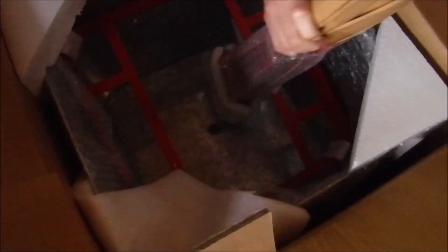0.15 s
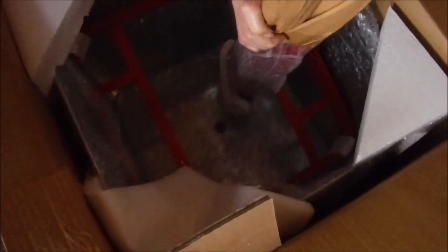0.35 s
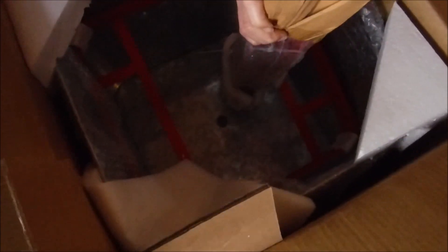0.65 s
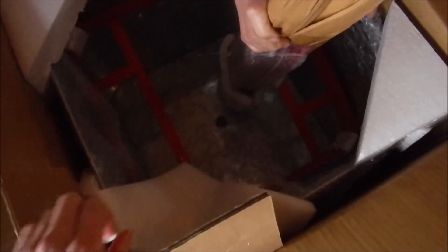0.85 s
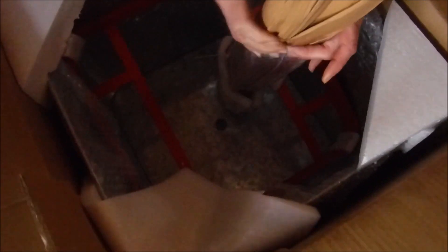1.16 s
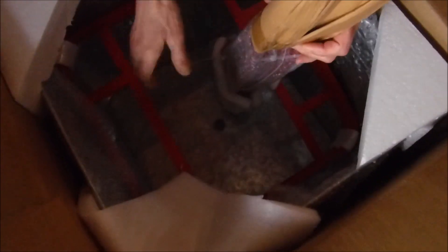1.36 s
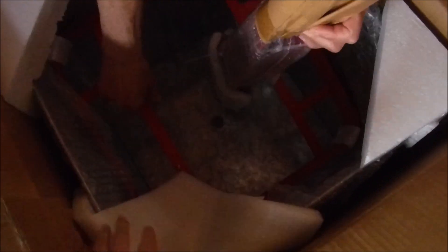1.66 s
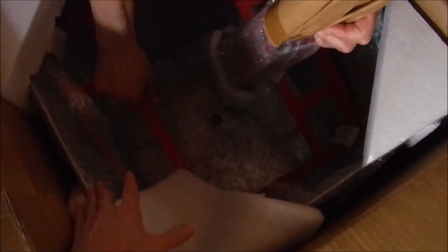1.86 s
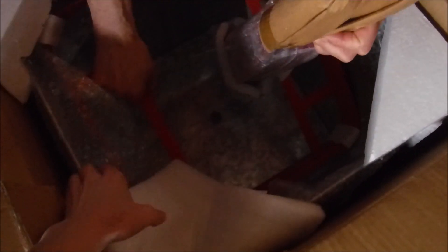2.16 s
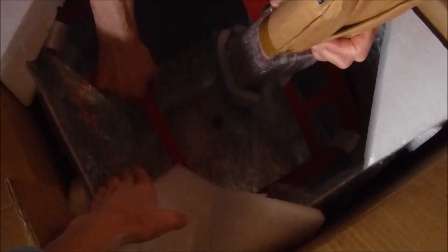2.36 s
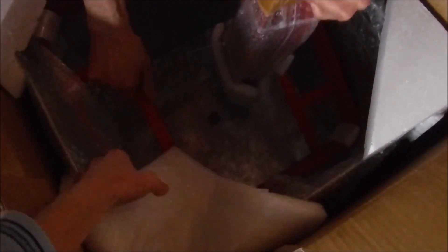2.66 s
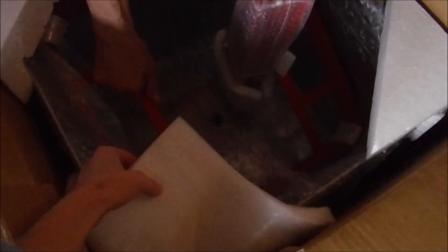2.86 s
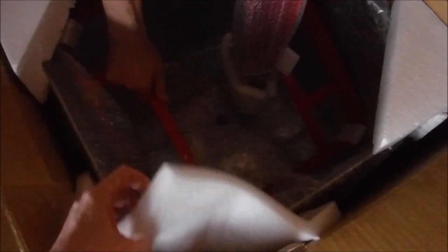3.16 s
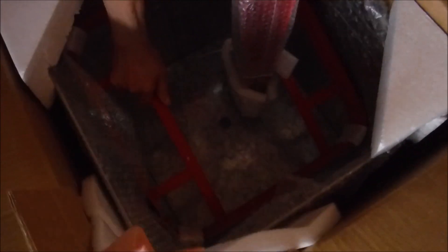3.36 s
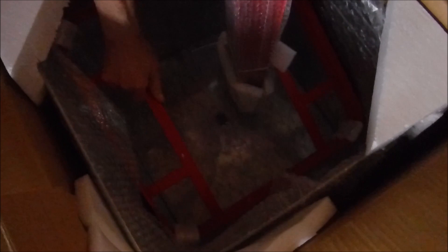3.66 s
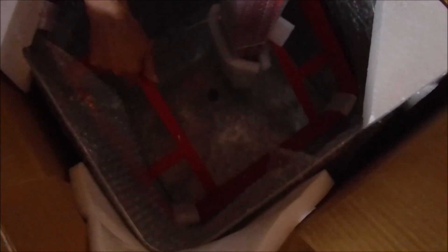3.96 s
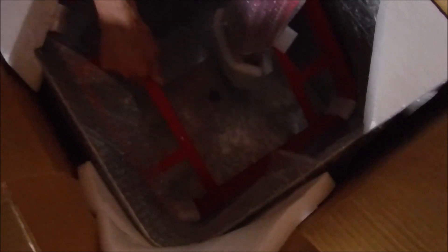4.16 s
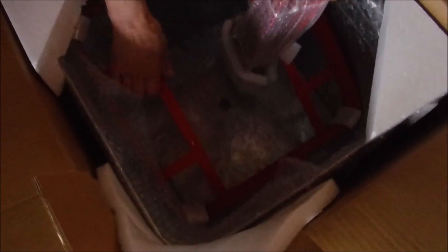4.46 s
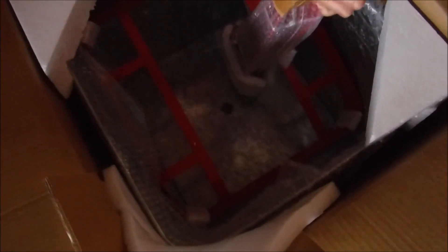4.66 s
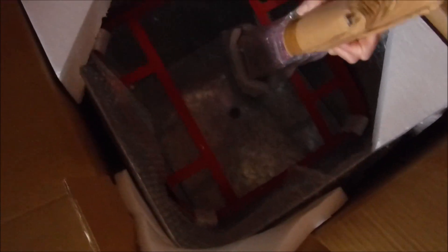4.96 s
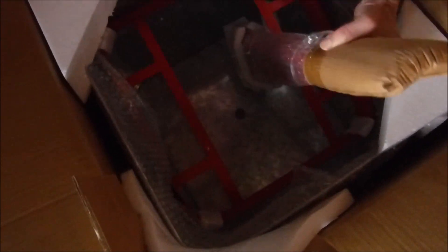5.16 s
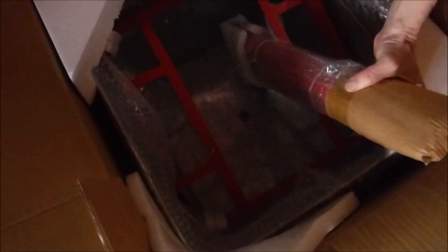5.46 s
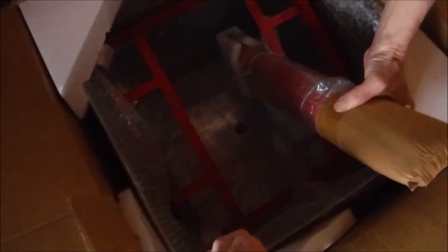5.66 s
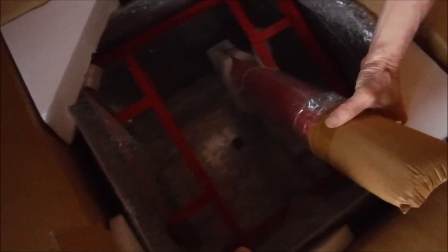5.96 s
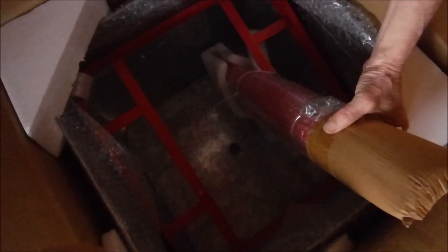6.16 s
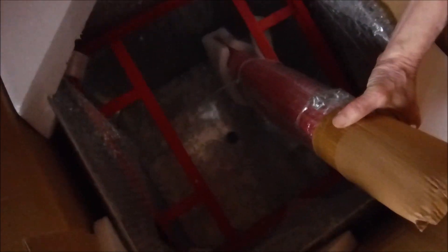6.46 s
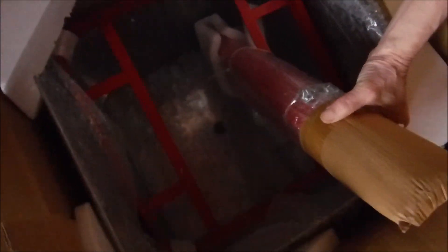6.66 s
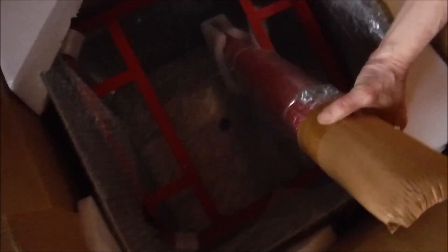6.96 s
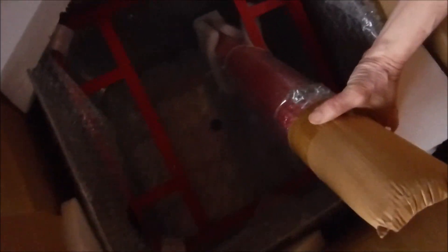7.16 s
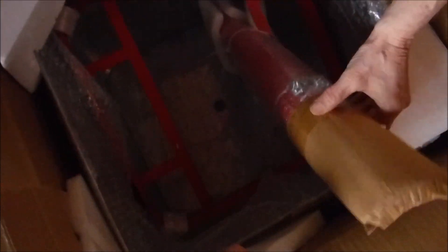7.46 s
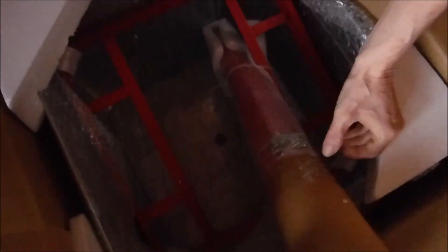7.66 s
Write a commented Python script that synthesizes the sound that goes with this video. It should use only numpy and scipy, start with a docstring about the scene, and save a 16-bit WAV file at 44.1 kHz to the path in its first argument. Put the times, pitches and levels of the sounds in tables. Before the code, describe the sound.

Crisp plastic film and stiffer packing paper rub, tick and snap irregularly, heard close in mono with faint room noise and hum. After a lively start the handling thins to isolated creases, dull cardboard bumps and a brief foam squeak. A quiet middle gives way to vigorous crunching and sharp knocks on the box, ending with looser, brighter crackling.

```python
"""Hands lift a part wrapped in plastic film and packing paper out of a cardboard box, in a small quiet room.
From the start, room noise and faint hum; strokes rub and crinkle film and paper as noise-driven buckles.
At once the part knocks the box (damped modes), creases snap (volleys of buckles), then soft bumps (noise pushes).
After 2 s foam squeaks briefly (unsteady tones). Wrapping is denser and louder from about 5.8 s to the end.
"""
import sys
import numpy as np
from scipy import signal
from scipy.fft import rfft, irfft
from scipy.io import wavfile
from scipy.ndimage import uniform_filter1d

SR = 44100
rng = np.random.default_rng(int(sys.argv[2]) if len(sys.argv) > 2 else 0)


def to_wav(s):
    """Save 16-bit WAV."""
    ch = np.atleast_2d(s).T  # columns
    pcm = np.round(np.clip(ch, -1, 1) * 32767)  # PCM
    wavfile.write(sys.argv[1], SR, pcm.astype(np.int16))


N = 344406
TIME = np.arange(N) / SR


def amp(db):
    """Decibels to gain."""
    return 10 ** (np.asarray(db) / 20)


def unit(x):
    """Scales to rms 1."""
    return x / np.sqrt(np.mean(x ** 2) + 1e-20)


def read(points, hz):
    """Reads a table on a log-frequency axis."""
    f, value = np.transpose(points)
    return np.interp(np.log(hz + 1), np.log(f), value)


def curve(rows, axis=1):
    """One dB column of a time table as a gain per sample."""
    rows = np.asarray(rows)
    return amp(np.interp(TIME, rows[:, 0], rows[:, axis]))


def add(mix, start_s, sound):
    """Mixes a sound in at start_s, cropped to the mix."""
    start = round(start_s * SR)
    sound = sound[max(-start, 0):]
    part = mix[max(start, 0):][:len(sound)]
    part += sound[:len(part)]


def response(spectrum, size=2048):
    """Causal (minimum-phase) impulse response with the given spectrum."""
    hz = abs(np.fft.fftfreq(size, 1 / SR))
    log_gain = np.log(amp(read(spectrum, hz)))
    minimum_phase = np.exp(np.conj(signal.hilbert(log_gain)))
    return np.fft.ifft(minimum_phase).real[:size // 2]


def colour(x, spectrum, size=2048):
    """Gives x a spectrum, at rms 1."""
    return unit(signal.oaconvolve(x, response(spectrum, size=size))[:len(x)])


def wander(per_s):
    """Random curve of rms 1: straight lines between per_s random points a second."""
    return unit(np.interp(TIME * per_s, np.arange(4096), rng.standard_normal(4096)))


# Room noise spectrum. Each row: frequency in Hz, relative level in dB per Hz.
ROOM_NOISE_SPECTRUM = [(15, 3), (30, 1.5), (70, 0), (150, -1.5), (240, -1), (400, -8), (800, -12),
                       (2000, -15), (6000, -19), (11000, -27.5), (16000, -28.5)]
# Hum tones. Each row: mean frequency in Hz, relative level in dB.
HUM_TONES = [(118.4, -64.5), (226.1, -60), (360.7, -68)]


def background(noise_db=-53.5, hum_db=-1, waver_db=2.5):
    """Steady coloured noise plus faint tones that waver in level and phase."""
    hum = np.zeros(N)
    for hz, db in HUM_TONES:
        gain = amp(db + waver_db * wander(8.3))
        hum += gain * np.sin(2 * np.pi * hz * TIME + 0.98 * wander(11))
    noise = colour(rng.standard_normal(N), ROOM_NOISE_SPECTRUM, size=8192)
    return amp(noise_db) * noise + amp(hum_db) * np.sqrt(2) * hum


# Hand strokes. Each row: start of hold in s, length of hold in s, thin film level in dB, stiff paper level in dB.
HAND_STROKES = [(0, 0.03, -18.5, -29), (0.046, 0.026, -29, -39), (0.121, 0.058, -24, -37.5),
                (0.201, 0.036, -29, -44.5), (.475, 0.005, -42, -56), (.745, 0.054, -39.5, -52),
                (1.08, 0.045, -31, -39.5), (1.152, 0.077, -39, -50.5), (1.328, 0.06, -40, -57.5),
                (1.542, 0.074, -38, -40), (1.651, 0.057, -36, -50), (1.729, 0.023, -35, -45),
                (1.938, 0.12, -38, -44.5), (2.026, 0.14, -34.5, -39.5), (2.439, 0.064, -44, -52),
                (2.867, .04, -41.5, -51), (2.93, .05, -39, -52), (3, 0.092, -44, -49.5),
                (3.451, 0.042, -42.5, -54), (3.576, 0.079, -48.5, -56), (3.91, .03, -43.5, -55),
                (3.966, 0.095, -40.5, -47.5), (4.374, .12, -48.5, -56.5), (4.835, 0.0069, -37.5, -49),
                (4.912, 0.022, -40, -44), (5.024, 0.038, -35, -68), (5.142, 0.061, -38, -47.5),
                (5.248, 0.037, -37, -46.5), (5.438, 0.068, -33, -43.5), (5.585, .03, -34, -47.5),
                (5.773, 0.0086, -37, -39.5), (5.814, 0.023, -25.5, -35.5), (5.877, 0.039, -19.5, -35.5),
                (5.981, 0.069, -29.5, -33), (6.125, 0.048, -36.5, -38), (6.214, 0.062, -23, -31),
                (6.336, 0.037, -16.5, -21.5), (6.398, 0.034, -16.5, -21.5), (6.476, 0.068, -33, -39),
                (6.581, 0.019, -25, -23.5), (6.612, 0.046, -28, -39.5), (6.75, 0.026, -26, -43),
                (6.8, 0.048, -24, -33), (6.981, 0.047, -28, -40), (7.107, 0.046, -24, -40),
                (7.248, .075, -32.5, -41), (7.486, 0.066, -23.5, -38), (7.586, 0.032, -24.5, -30),
                (7.648, 0.016, -29.5, -40), (7.689, 0.077, -37, -43.5)]
# Light rubbing between strokes. Each row: time in s, film level in dB.
LIGHT_CONTACT = [(0, -35.5), (.28, -39.5), (.44, -53), (.72, -43.5), (.93, -60.5), (1.08, -42),
                 (1.48, -47.5), (1.8, -40), (2.25, -47), (3.15, -42), (3.78, -56.5), (4.12, -48.5),
                 (4.8, -53.5), (4.86, -40), (6.72, -42), (6.92, -33), (7.25, -31), (7.8, -46.5)]


def rubbing(rise_s=0.014, release_s=0.014, contact_paper_db=-9.5):
    """Gains of film and paper: each stroke swells, holds and dies away, on top of light contact."""
    contact = curve(LIGHT_CONTACT)
    power = np.array([contact, contact * amp(contact_paper_db)]) ** 2  # paper relative to film
    for start_s, length_s, film_db, paper_db in HAND_STROKES:
        before = np.maximum(start_s - TIME, 0) / rise_s
        after = np.maximum(TIME - start_s - length_s, 0) / release_s
        power += amp([[film_db], [paper_db]]) ** 2 * np.exp(-2 * np.minimum(before + after, 20))
    return np.sqrt(power)


def facet(ring_s, ring_share, lo_hz, hi_hz, count=4, size=400):
    """One patch of sheet buckling: a click and a few quickly dying modes of its own."""
    t = np.arange(size) / SR
    hz = lo_hz * (hi_hz / lo_hz) ** rng.random((count, 1))
    ring = (np.cos(2 * np.pi * hz * t) * np.exp(-t / ring_s)).sum(0)
    click = t == 0
    pop = ring_share * ring / np.linalg.norm(ring) + click
    return pop / np.linalg.norm(pop)


def crinkle(per_s, spread_db, clump_db, ring_s, ring_share, count=24):
    """Clumps of tiny buckles, many small and few large, each on one of many facets."""
    sizes = amp(spread_db * np.minimum(rng.exponential(1, N), 4)) * rng.choice([-1, 1], N)
    clicks = sizes * (rng.random(N) < per_s / SR) * amp(clump_db * wander(130))
    which = rng.integers(0, count, N)
    out = np.zeros(N)
    for k in range(count):
        pop = facet(ring_s, ring_share, lo_hz=1203, hi_hz=9280)
        out += signal.oaconvolve(clicks * (which == k), pop)[:N]
    return unit(out)


def catches(per_s, length_s):
    """Ridges of the wrap catch and let go at an uneven pace; power of these short scrunches, mean 1."""
    ridges = np.floor(np.cumsum(per_s * amp(3 * wander(per_s))) / SR)
    strength = amp(7 * np.minimum(rng.standard_normal(N), 2))
    pulse = np.hanning(round(length_s * SR)) ** 2
    power = signal.oaconvolve(np.diff(ridges, prepend=0) * strength, pulse, "same")
    return abs(power) / abs(power).mean()


# Film spectrum, also used by the snaps. Each row: frequency in Hz, relative level in dB per Hz.
FILM_SPECTRUM = [(800, -50), (2000, -11.5), (2900, -7.5), (4200, -2.5), (5400, 3), (6400, 2.56),
                 (7400, -3.5), (8800, -8), (10500, -16.5), (13000, -26.5), (16000, -29)]
# Rubbed paper spectrum. Each row: frequency in Hz, relative level in dB per Hz.
PAPER_SPECTRUM = [(60, -30), (140, 3), (205, 4.5), (400, -5), (640, 1.5), (820, 3), (1000, -1),
                  (1350, -1.5), (1700, 1.5), (2100, 2), (2600, 3.5), (3400, -0.5), (5000, -16.5),
                  (9000, -39)]


def wrapping(slide_db=-2, tick_db=-9, effort_knee_db=-44.5):
    """Sliding hiss and crinkles excite film and paper together; harder handling buckles more facets."""
    film, paper = rubbing()
    effort = film / (film + amp(effort_knee_db))
    light = crinkle(per_s=1300, spread_db=3, clump_db=1.5, ring_s=0.0011, ring_share=1.2)
    hard = crinkle(per_s=5000, spread_db=2.7, clump_db=1.5, ring_s=0.0011, ring_share=1)
    hiss = amp(slide_db) * rng.standard_normal(N)
    drive = np.sqrt(1 - effort) * light + np.sqrt(effort) * hard + hiss
    # small creases tick at random, mostly while the wrapping moves gently
    ticks = crinkle(per_s=18, spread_db=2.2, clump_db=-2, ring_s=0.0019, ring_share=1.2, count=6)
    drive += amp(tick_db) * (1 - effort) * ticks
    # a gentle slide goes in separate scrunches, a hard one blurs them
    grip = 0.5 - 0.22 * effort
    scrunch = np.sqrt(1 - grip + grip * catches(per_s=110, length_s=0.009))
    # stiff paper also folds on its own, in fewer steps
    folds = crinkle(per_s=650, spread_db=1.16, clump_db=3, ring_s=0.0033, ring_share=0.48)
    return film * colour(drive * scrunch, FILM_SPECTRUM) + paper * colour(drive + folds, PAPER_SPECTRUM)


# Hard knocks of the part inside the box. Each row: start in s, relative level in dB.
PART_KNOCKS = [(.003, -20.5), (1.346, -33.5), (3.073, -36), (3.103, -35.5), (4.829, -29), (5.783, -29),
               (6.035, -25), (6.405, -14.5), (6.5755, -16), (6.5795, -9.5), (6.868, -34), (7.391, -32.5),
               (7.603, -26)]
# Box modes. Each row: nominal frequency in Hz, relative level in dB, 60 dB decay time in s.
KNOCK_MODES = [(131, -20, 0.13), (222, -1.5, 0.01), (358, -6.5, 0.024), (658, 2, 0.029), (780, 1, 0.0077),
               (1096, -4, 0.024), (1580, -6, 0.036)]


def knocks(level_db=-3, size=9000):
    """The part strikes the box and rings its damped modes, detuned a little at each blow."""
    out, t = np.zeros(N), np.arange(size) / SR
    for start_s, db in PART_KNOCKS:
        for k, (hz, mode_db, t60_s) in enumerate(KNOCK_MODES):
            # neighbouring modes of a wall swing in opposite senses
            swing = (-1) ** k * np.sin(2 * np.pi * hz * rng.uniform(0.887, 1.03) * t)
            add(out, start_s, amp(db + level_db + mode_db - 60 * t / t60_s) * swing)
    return out


def volley(run_s, spread_db=7.3, size=2048):
    """Buckles build up to the middle of the span, where the crease gives way and the rest die out."""
    t = (np.arange(size) - size // 2) / SR
    run_s = max(run_s, 1 / SR)
    swell = np.exp(-abs(t) / run_s) * np.where(t < 0, amp(-10), 1)
    buckles = swell * rng.standard_normal(size) * amp(spread_db * rng.standard_normal(size))
    z = rfft(buckles)
    # a snap is broadband: no one pitch stands out
    return irfft(z / np.sqrt(uniform_filter1d(abs(z) ** 2, size=110) + 1e-12))


# Creases that snap. Each row: time of giving way in s, film level in dB, paper level in dB, run time constant in s.
CREASE_SNAPS = [(0.009, -12.5, -29, .0017), (.0553, -20.5, -31, .0045), (0.1735, -21, -37, 0.0026),
                (.216, -21.5, -27.5, 0.0016), (.258, -21.5, -25, 0.0011), (0.413, -29.5, -39.5, 0.0037),
                (0.477, -26.5, -30.5, 0.0061), (.5103, -35.5, -54, 0.00055), (.6, -36, -48, .0015),
                (.651, -31.5, -26.5, 0.0015), (0.6582, -27.5, -55, 0.00091), (0.994, -27.5, -37, 0.0016),
                (1.001, -26.5, -40, .0014), (1.031, -30.5, -39, 0.0063), (1.072, -35, -36, .005),
                (1.117, -22.5, -43, 0.0015), (1.204, -22, -58, 0.00089), (1.245, -29, -32.5, .004),
                (1.273, -28, -62, 0.0012), (1.344, -31, -34.5, 0.0036), (1.45, -39, -57, .0007),
                (1.6055, -20.5, -40, 0.0032), (2.006, -24.5, -59, 0.0075), (2.046, -22, -54, 0.0058),
                (2.153, -30.5, -33, .004), (2.281, -40, -60, 0.0018), (2.471, -35, -38.5, 0.0023),
                (2.566, -37.5, -62, 0.0019), (2.872, -34, -54, 0.00076), (3.199, -31, -49, 0.0077),
                (3.3424, -35.5, -55, 0.00094), (3.7707, -34, -52, .001), (4.0997, -32, -41.5, 0.0015),
                (4.362, -38, -49, .004), (4.6364, -42, -44.5, 0.0016), (4.922, -24, -34, 0.0049),
                (5.032, -24.5, -47, .001), (5.039, -31.5, -47, 0.00062), (5.3844, -28.5, -35.5, 0.0014),
                (5.68, -29, -51, 0.0043), (5.77, -19.5, -26.5, 0.0048), (5.975, -16.5, -36, 0.0087),
                (5.997, -16.5, -32, 0.0022), (6.0036, -21, -23, 0.0011), (6.0344, -14.5, -17, 0.0019),
                (6.1936, -20, -31, 0.0015), (6.2634, -24, -37, .005), (6.314, -15.5, -20, 0.0041),
                (6.3281, -16.5, -15, 0.00023), (6.3317, -17, -12.5, 0.0022), (6.403, -15.5, -19, .002),
                (6.405, -11.5, -28, 0.0029), (6.5774, -43, -23, 0.002), (6.579, -18, -14, 0.0012),
                (6.9466, -35, -20.5, 0.00028), (7.148, -29, -27.5, .009), (7.2954, -19, -26, .006),
                (7.514, -18, -48, 0.0049), (7.528, -16.5, -29, 0.0025), (7.616, -25.5, -48, .001)]
# Snapping paper spectrum. Each row: frequency in Hz, relative level in dB per Hz.
CREASE_SPECTRUM = [(200, -20), (700, 2.5), (1400, 10), (2600, 12.5), (4200, 7.5), (6000, -6.5),
                   (12000, -56)]


def snaps():
    """Each crease drives film and paper; its level is its energy spread over 5 ms."""
    out, film, paper = np.zeros(N), response(FILM_SPECTRUM), response(CREASE_SPECTRUM)
    energy_norm = np.sqrt(0.005 * SR)
    for snap_s, film_db, paper_db, run_s in CREASE_SNAPS:
        buckles = volley(run_s)
        for sheet, db in ((film, film_db), (paper, paper_db)):
            sound = signal.fftconvolve(buckles, sheet)
            start_s = snap_s - len(buckles) / 2 / SR
            add(out, start_s, amp(db) * energy_norm * sound / np.linalg.norm(sound))
    return out


# Soft bumps of hands and load on the box. Each row: start in s, relative wall level in dB, deep thud level in dB.
BOX_BUMPS = [(0.232, -30, -65), (.391, -37, -53), (0.478, -35.5, -58), (0.986, -35.5, -48),
             (1.098, -37.5, -60), (1.343, -46, -39), (1.684, -35.5, -44.5), (1.93, -32, -37),
             (1.958, -36, -35.5), (2.044, -33.5, -53), (2.124, -35.5, -62), (3.071, -35.5, -54),
             (3.1, -33, -56), (3.326, -46, -66), (4.828, -32, -50), (4.928, -40, -54), (5.774, -32, -37),
             (5.973, -37, -51), (6.197, -29.5, -48), (6.327, -33, -42), (6.402, -30, -47),
             (6.575, -56, -37), (6.72, -49, -40), (6.794, -55, -34.5), (6.863, -38, -46), (6.941, -61, -38),
             (7.382, -38, -46), (7.602, -38, -29.5), (7.631, -48, -32.5), (7.682, -34, -37),
             (7.73, -36.5, -52)]
# Cardboard wall spectrum. Each row: frequency in Hz, relative level in dB per Hz.
WALL_SPECTRUM = [(30, -30), (90, -7), (135, -2), (175, 4.5), (230, 1.5), (310, -10.5), (450, -11),
                 (900, -21.5), (3000, -62)]
# Box air spectrum. Each row: frequency in Hz, relative level in dB per Hz.
THUD_SPECTRUM = [(12, -16.5), (28, -0.5), (45, -9), (65, -4), (100, -19), (200, -28.5), (600, -67)]


def bumps(wall_db=-5, rise_s=0.0025, wall_decay_s=0.025, thud_decay_s=0.031, size=16384):
    """A soft blow shakes the cardboard walls and pushes the air in the box."""
    out, t = np.zeros(N), np.arange(size) / SR
    for start_s, db, deep_db in BOX_BUMPS:
        wall = (WALL_SPECTRUM, db + wall_db, wall_decay_s)
        thud = (THUD_SPECTRUM, deep_db, thud_decay_s)
        for spectrum, level_db, decay_s in (wall, thud):
            push = (1 - np.exp(-t / rise_s)) * np.exp(-t / decay_s)
            push /= push.max()
            shake = push * colour(rng.standard_normal(2 * size), spectrum, size=8192)[size:]
            add(out, start_s, amp(level_db) * shake * np.linalg.norm(push) / np.linalg.norm(shake))
    return out


# Foam sheet under the fingers. Each row: start in s, level in dB, mean pitch in Hz, length in s.
FOAM_SQUEAKS = [(2.081, -33, 814, 0.03), (2.195, -47.5, 808, .045), (2.43, -48, 814, 0.028)]


def squeaks(jitter=0.054, overtone_db=-14):
    """Foam sticks and slips in a brief unsteady tone with one overtone."""
    out = np.zeros(N)
    for start_s, db, hz, length_s in FOAM_SQUEAKS:
        size = round(length_s * SR)
        phase = 2 * np.pi * np.cumsum(hz * (1 + jitter * wander(210)[:size])) / SR
        tone = np.sin(phase) + amp(overtone_db) * np.sin(2 * phase)
        add(out, start_s, amp(db) * np.hanning(size) * tone)
    return out


# Changing tone of the wrapping. Each row: time in s, level of the band around 3.3 kHz in dB,
# level above 8.5 kHz in dB.
WRAPPING_TONE = [(0, 1.5, -2), (1.1, -2.5, -5), (1.7, -2, -0.5), (2.15, 0.5, -1), (2.45, -1.5, 0),
                 (3, -1, -3), (4.45, 0, 0.5), (4.92, -5.5, 0.5), (5.15, -1, 2), (5.65, -6, -6),
                 (6.35, 1.5, -0.5), (6.6, -4, -4.5), (7.15, 2.5, 8), (7.52, 3.5, 3), (7.8, 3.5, 10.5)]


def changing_tone(x, middle_hz=3300, treble_hz=8500):
    """Raises or lowers the bands below and above the film's main pitch, so its tone turns duller or brighter."""
    middle_band = signal.butter(2, [middle_hz * 0.56, middle_hz / 0.6], "band", fs=SR, output="sos")
    treble_band = signal.butter(3, treble_hz, "high", fs=SR, output="sos")
    middle, treble = signal.sosfiltfilt(middle_band, x), signal.sosfiltfilt(treble_band, x)
    return x + (curve(WRAPPING_TONE, axis=1) - 1) * middle + (curve(WRAPPING_TONE, axis=2) - 1) * treble


def shifting_echoes(x, count=14, turns_per_s=18):
    """Quick echoes off box walls and folds come and go as the wrapping turns, so its colour keeps changing."""
    strength = 0.38 / np.sqrt(count)
    delays_s = np.geomspace(0.0005, 0.009, count) * rng.uniform(0.9, 1.1, count)
    out, power = x, 1
    for delay_s in delays_s:
        gain = strength * wander(turns_per_s)
        out = out + np.pad(gain * x, (round(delay_s * SR), 0))[:N]
        power = power + gain ** 2
    return out / np.sqrt(power)


# Room decay. Each row: frequency in Hz, 60 dB decay time in s.
ROOM_DECAY = [(100, 1), (500, 0.45), (7000, 0.38), (15000, 0.31)]


def space(x, room_db=-20, gap_s=0.006, size=16384):
    """The small furnished room adds a short, faint tail of noise decaying at its own rate per band."""
    taps = rng.standard_normal(size) * (np.arange(size) > gap_s * SR)
    hz, t, z = signal.stft(taps, SR, nperseg=256)
    decay = amp(-60 * t / read(ROOM_DECAY, hz)[:, None])
    tail = signal.istft(z * decay, SR, nperseg=256)[1][:size]
    return x + signal.oaconvolve(x, amp(room_db) * tail / np.linalg.norm(tail))[:N]


def scene():
    """Wrapping and box sounds in the room, over the background, as one channel."""
    sheets = shifting_echoes(changing_tone(wrapping() + snaps()))
    handling = sheets + knocks() + bumps() + squeaks()
    return (background() + space(handling))[None]


def record(dry, edge_hz=15900):
    """Clips at full scale, then limits the band with a steep low-pass."""
    low_pass = signal.firwin(511, edge_hz, window=("kaiser", 9), fs=SR)
    return signal.oaconvolve(np.clip(dry, -1, 1), low_pass[None], "same")


dry = scene()
out = record(dry)
to_wav(out)
```